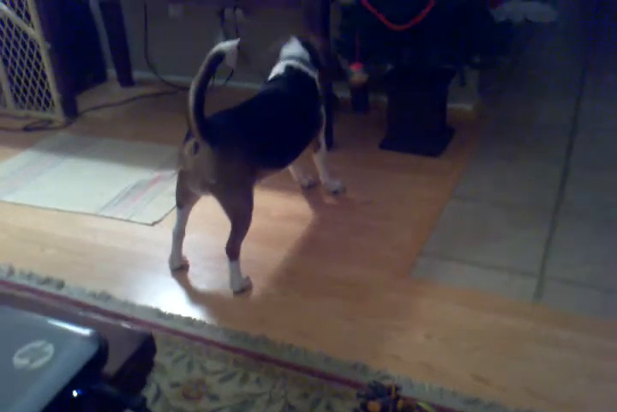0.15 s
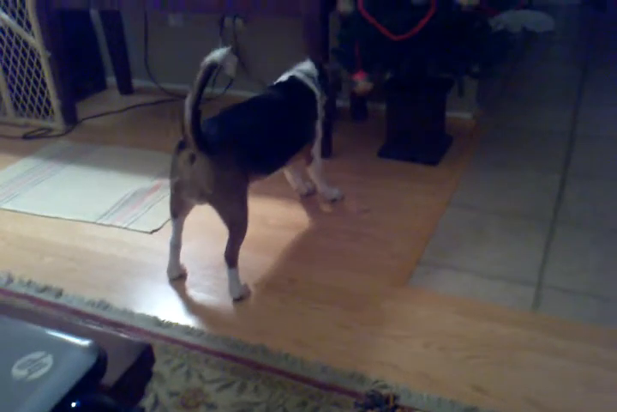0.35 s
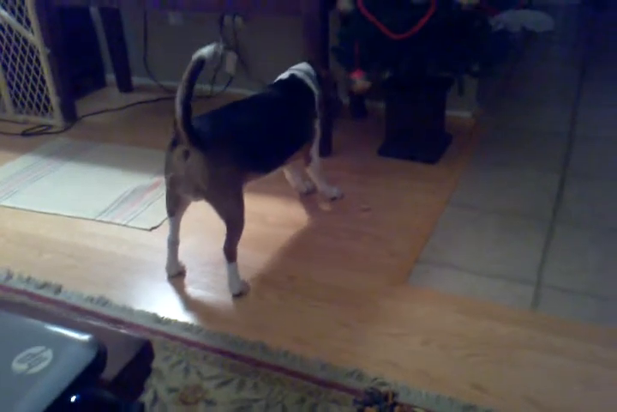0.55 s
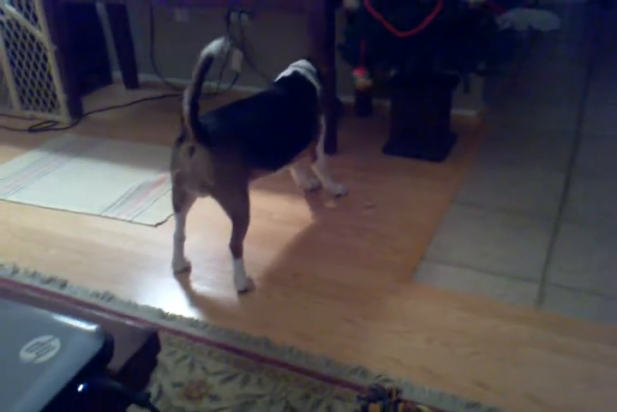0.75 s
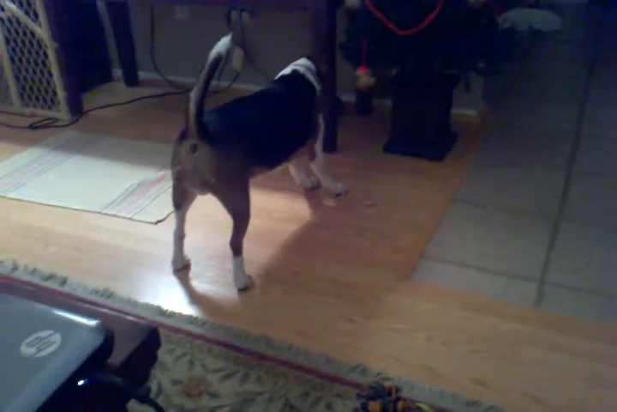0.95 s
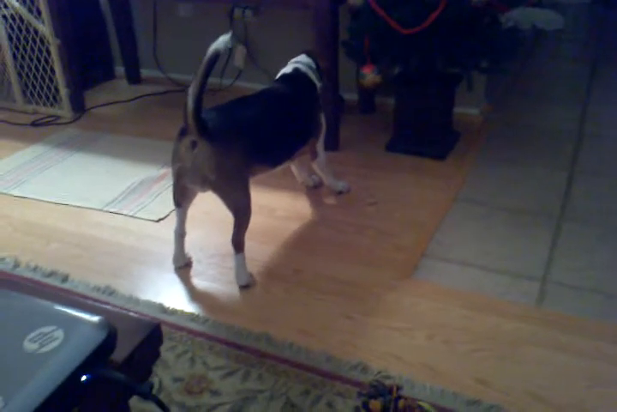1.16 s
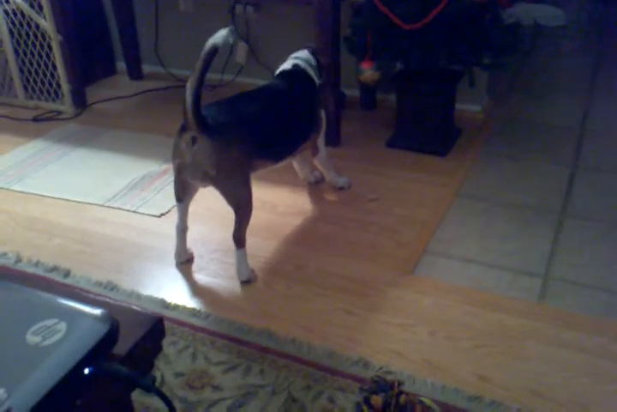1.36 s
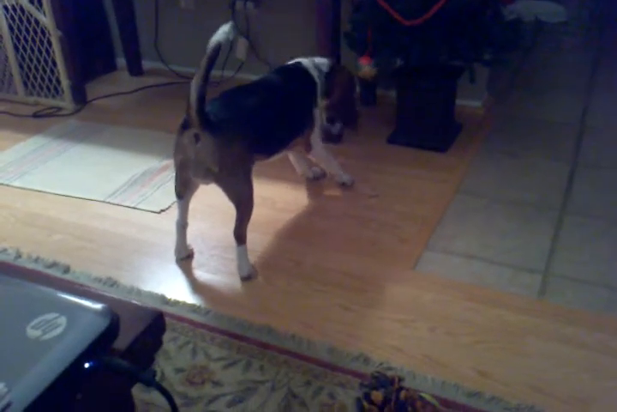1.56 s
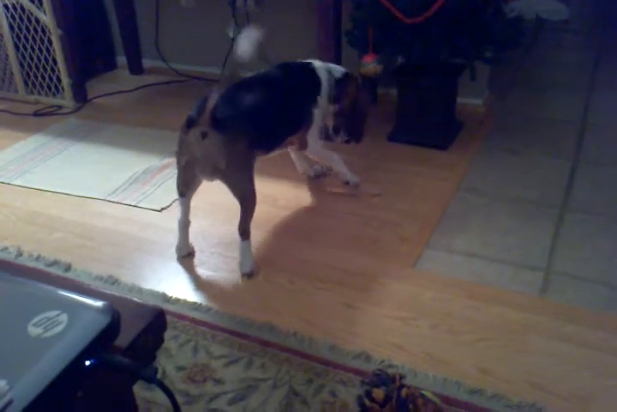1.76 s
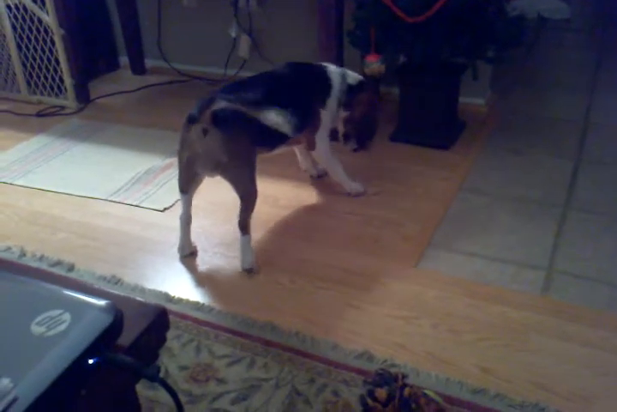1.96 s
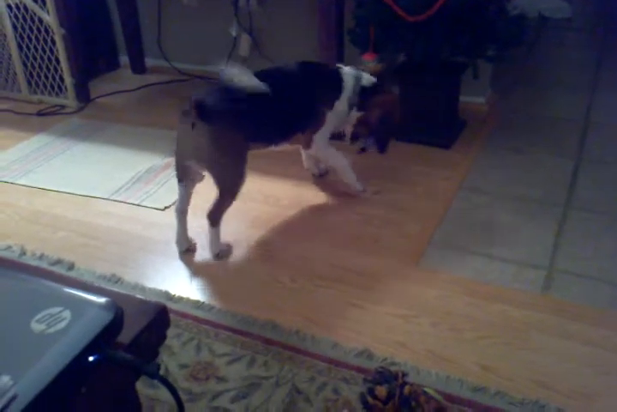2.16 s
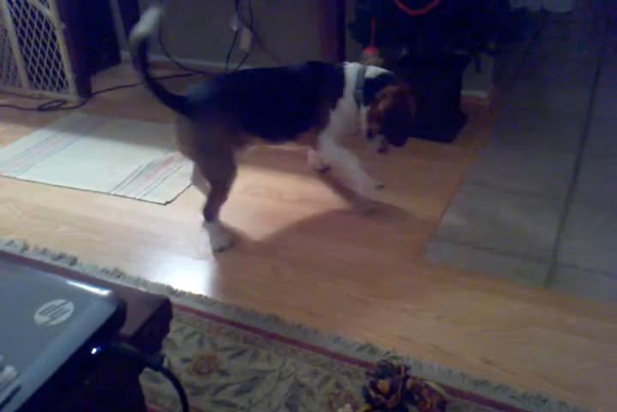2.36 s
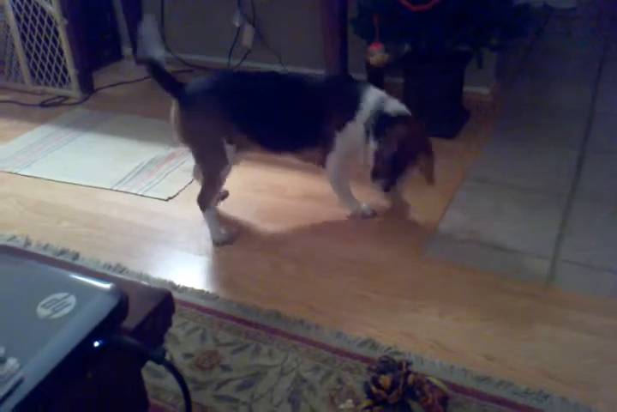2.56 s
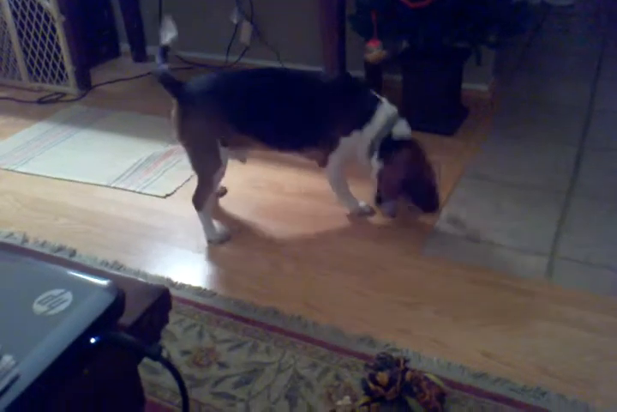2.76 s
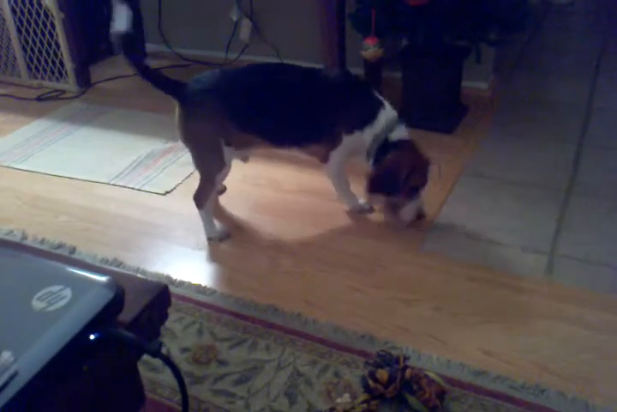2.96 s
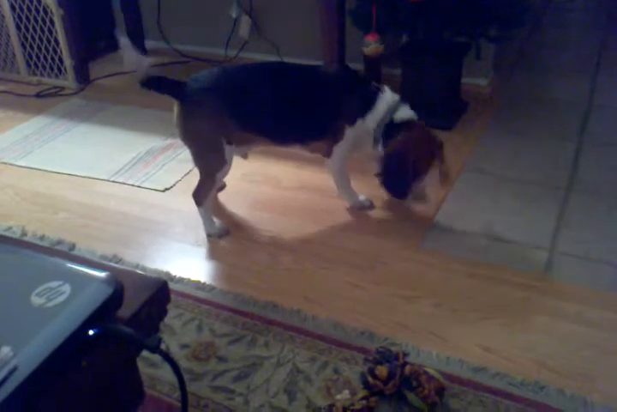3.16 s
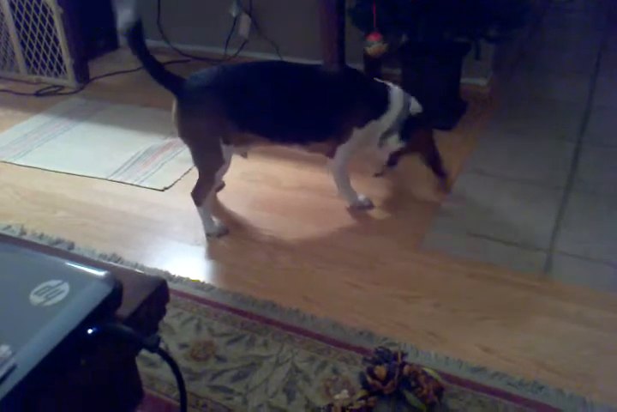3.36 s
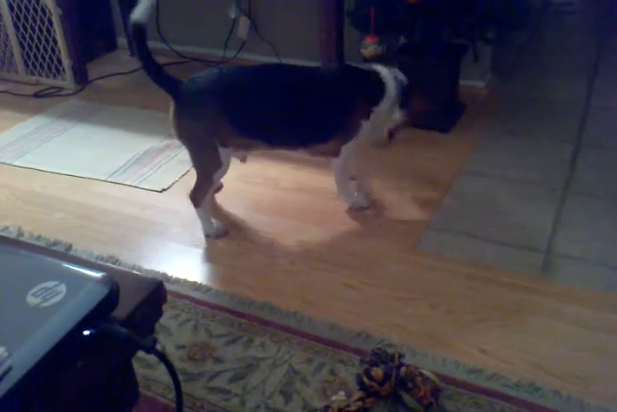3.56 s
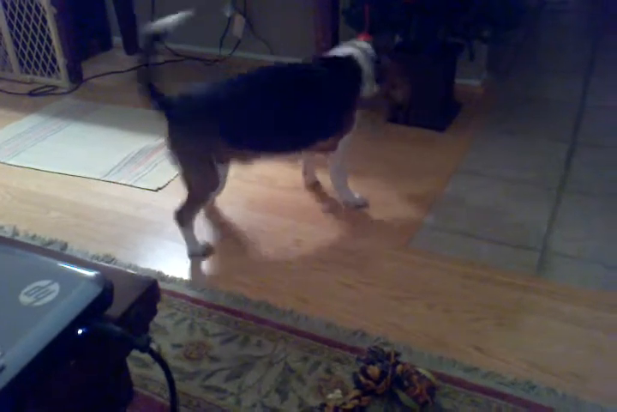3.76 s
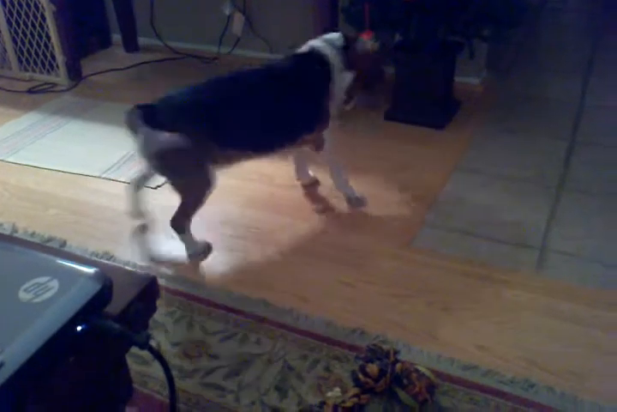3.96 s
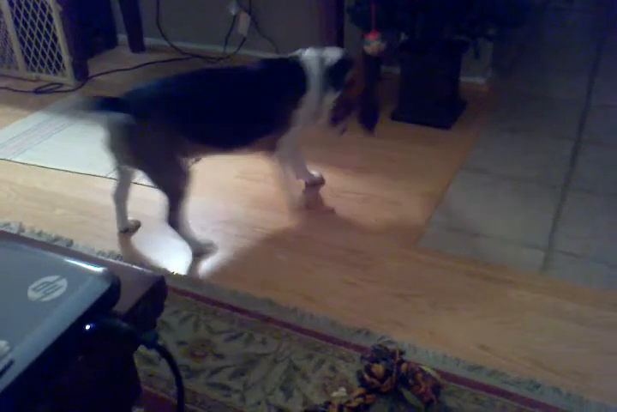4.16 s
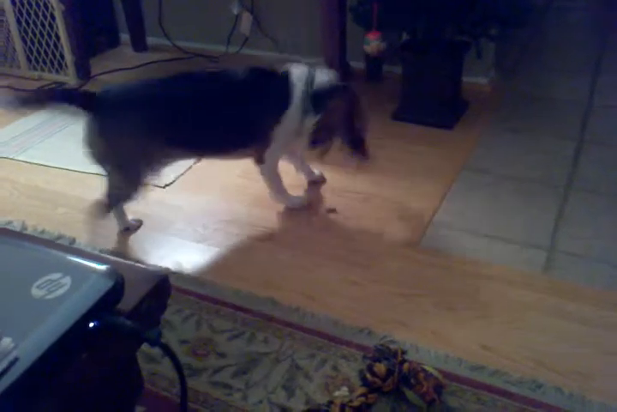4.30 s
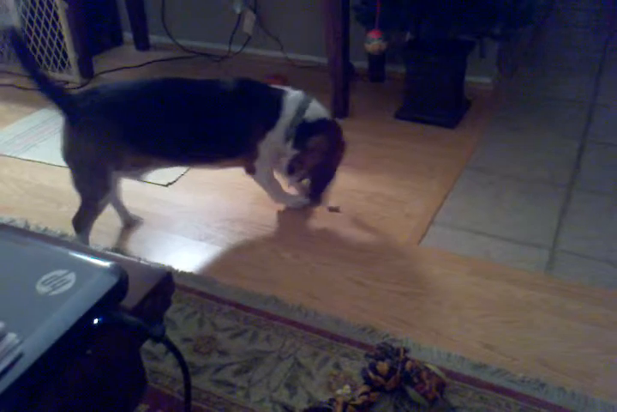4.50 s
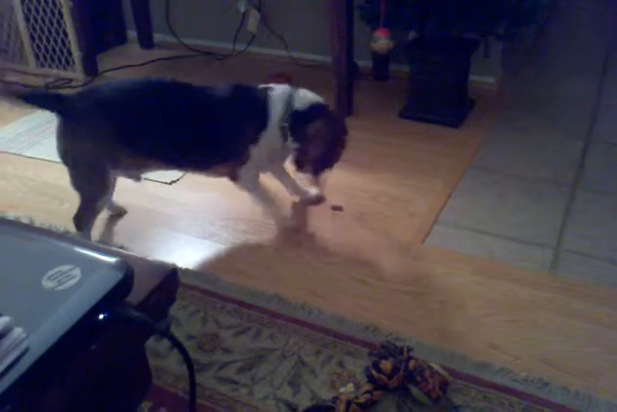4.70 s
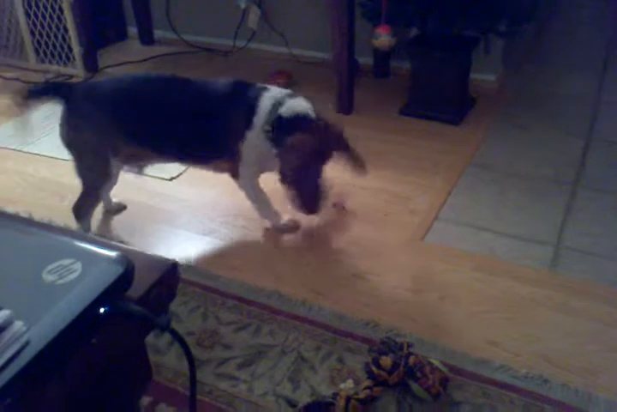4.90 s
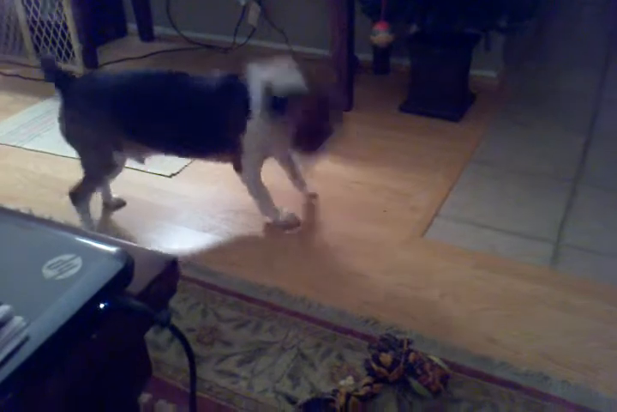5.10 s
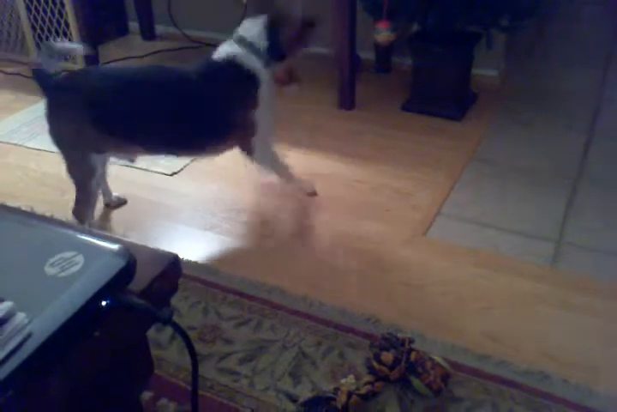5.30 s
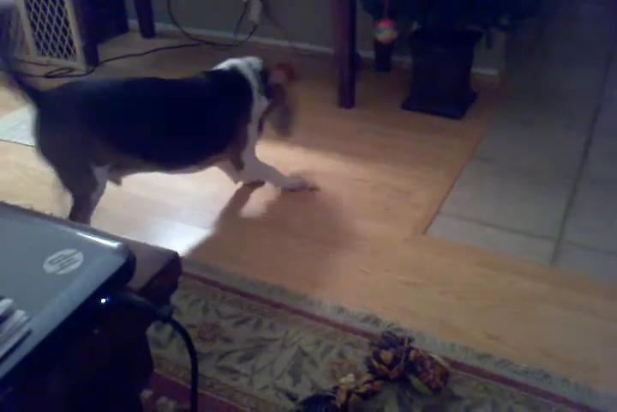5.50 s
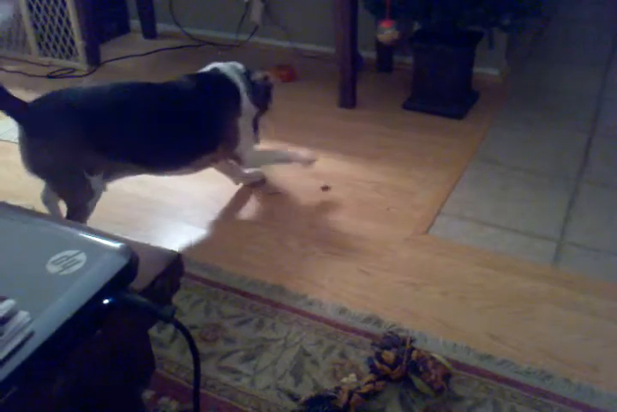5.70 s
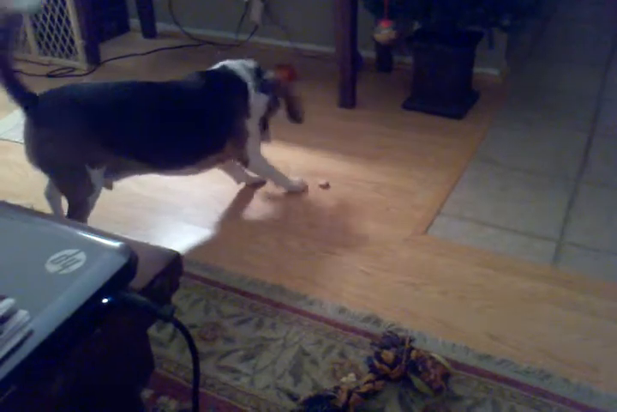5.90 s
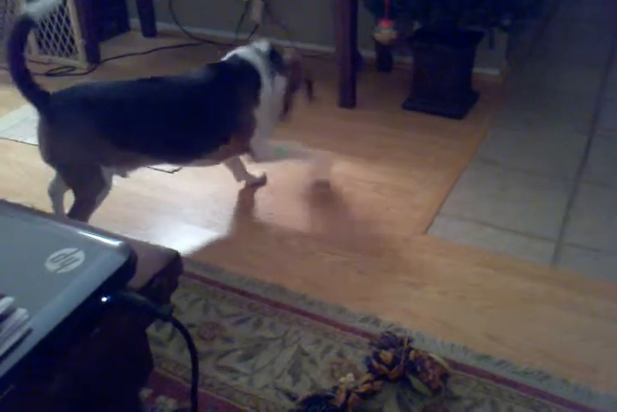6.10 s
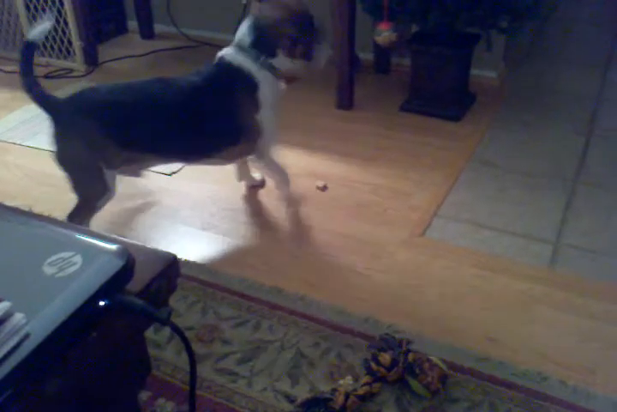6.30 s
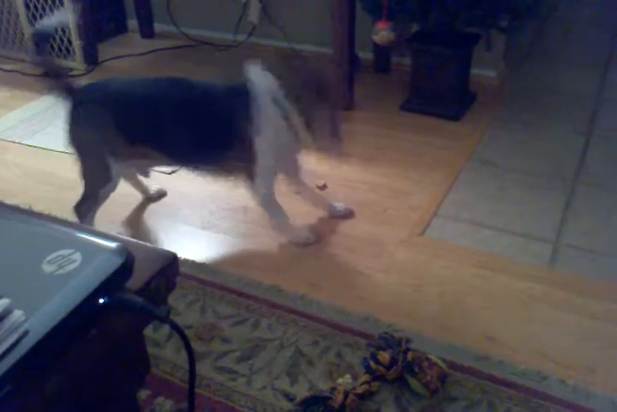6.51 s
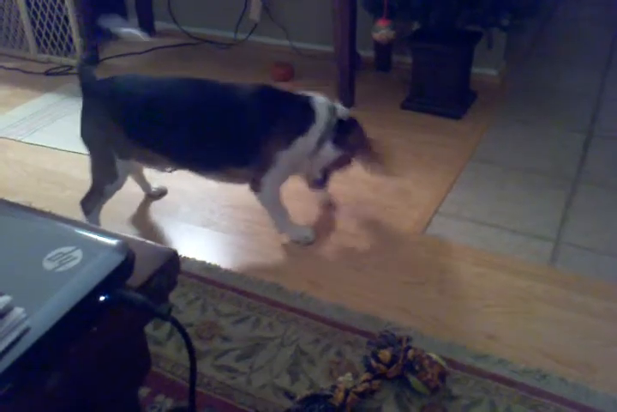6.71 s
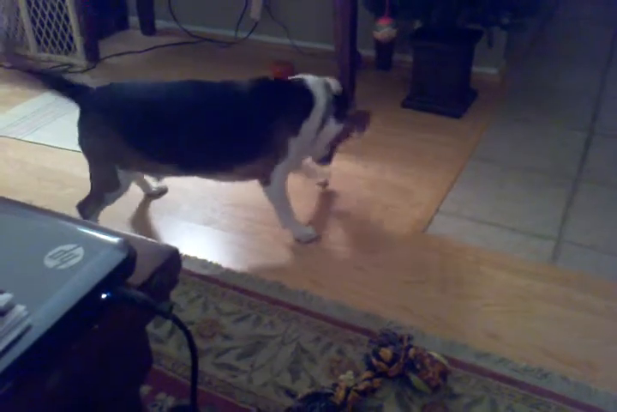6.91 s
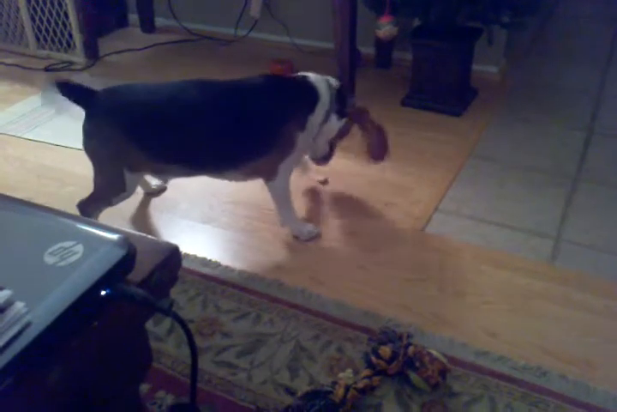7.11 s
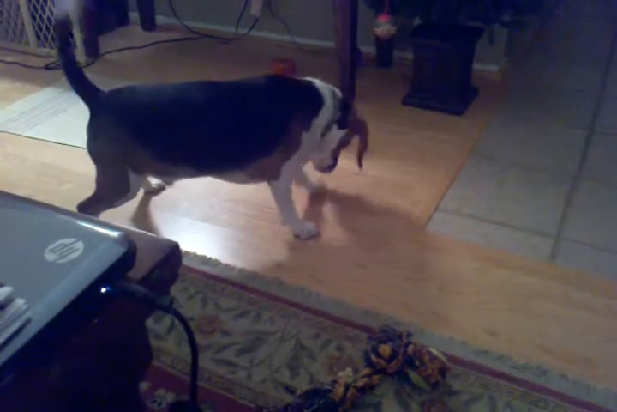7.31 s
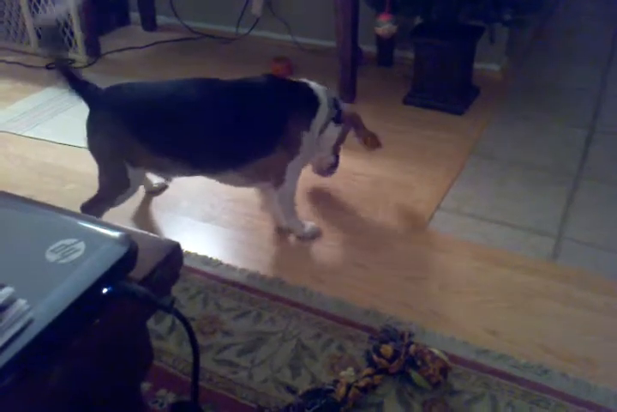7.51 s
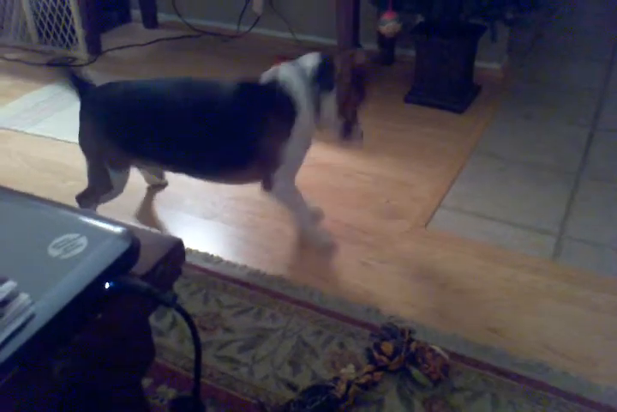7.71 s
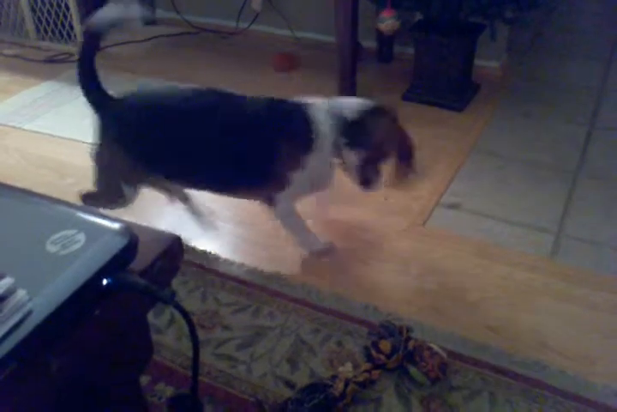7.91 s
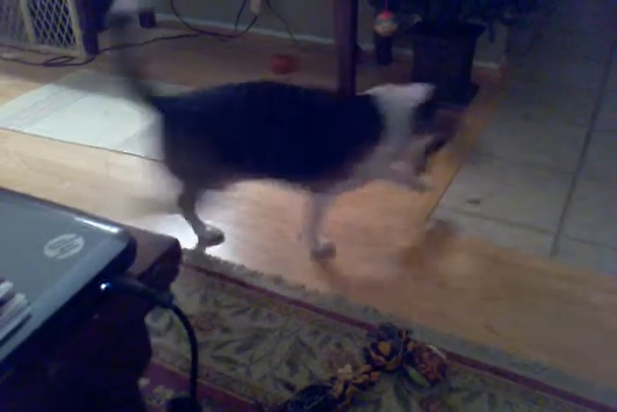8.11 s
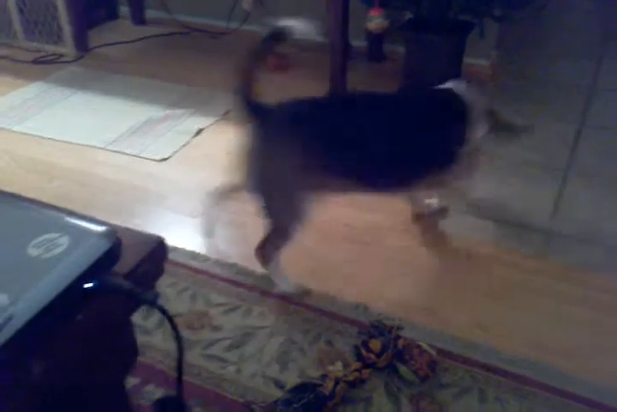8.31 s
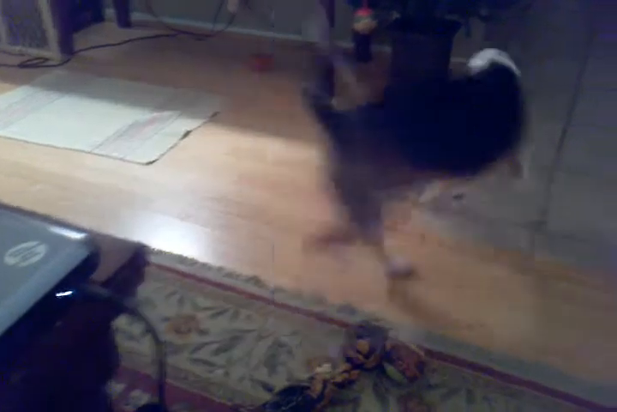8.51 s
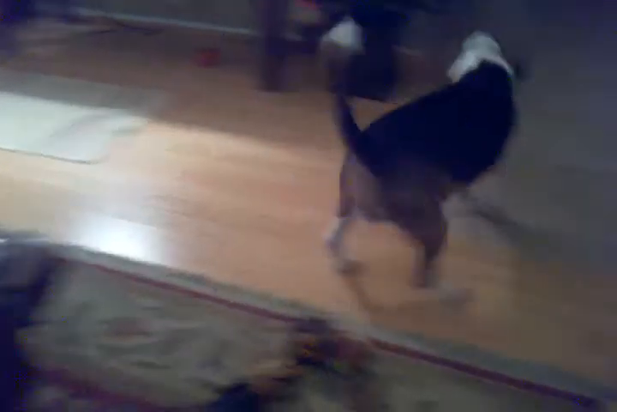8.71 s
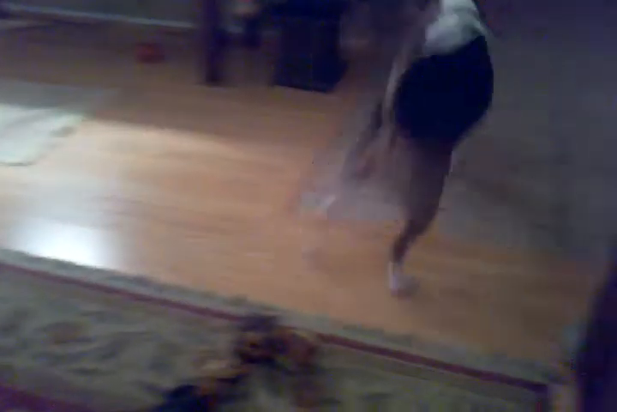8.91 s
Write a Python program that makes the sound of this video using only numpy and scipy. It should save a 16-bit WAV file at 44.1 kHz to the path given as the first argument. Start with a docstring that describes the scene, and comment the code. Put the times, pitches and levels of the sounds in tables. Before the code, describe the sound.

Close, dry claw sounds on a wooden floor: near silence over soft fan rush, then brittle clicks in twos and threes, short raspy scrapes, light paw scuffs and dull pad thumps. The boards knock and ring hollowly, and a collar tag tinkles faintly. A rattling scrabble peaks late, then sparse ticks follow as the dog leaves. The room adds a short echo, heard through a small camera's slightly phasey wide stereo.

```python
"""A living room with a hardwood floor: a dog paws at a treat close by, then trots off.
Claws click, knock, rattle and scrape, as sharp blows and stick-slip jerks that ring claw and board;
padded paws thump and scuff, a collar tag tinkles. The room answers briefly over a quiet fan and a hum.
The microphone is a small camera's, standing nearby, its stereo widened by combing mid and side."""
import sys
import numpy as np
from scipy import signal
from scipy.fft import rfft, irfft
from scipy.io import wavfile

SR = 44100
rng = np.random.default_rng(int(sys.argv[2]) if len(sys.argv) > 2 else 0)


def waveform_to_disk(signal):
    """Save audio, clipped to [-1, 1], as 16-bit WAV at the path in sys.argv[1]."""
    frames = np.transpose(np.atleast_2d(signal))
    scaled = np.clip(frames, -1, 1) * 32767
    samples = np.round(scaled).astype(np.int16)
    wavfile.write(sys.argv[1], SR, samples)


N = 399546  # length [samples]
# Levels in the tables are relative: each layer and the final mix add their own gain.


def gain_of(db):
    """Decibels to amplitude."""
    return 10 ** (np.asarray(db) / 20)


def evened(x):
    """Scales to rms 1."""
    return x / np.sqrt(np.mean(x ** 2) + 1e-20)


def unit(x):
    """Scales to energy 1."""
    return x / np.linalg.norm(x)


def read(points, hz):
    """Reads a table on a log-frequency axis."""
    f, value = np.transpose(points)
    return np.interp(np.log(hz + 1), np.log(f + 1), value)


def add(mix, s, sound):
    """Mixes a sound in at time s."""
    part = mix[max(round(s * SR), 0):][:len(sound)]
    part += sound[:len(part)]


def ring(colour, tilt_db=0, size=2048):
    """Minimum-phase impulse response of energy 1: a colour, tilted in dB per octave above 500 Hz."""
    hz = abs(np.fft.fftfreq(size, 1 / SR))
    octaves = np.log2(np.maximum(hz, 500) / 500)
    log_gain = np.log(gain_of(read(colour, hz) + tilt_db * octaves))
    spectrum = np.exp(np.conj(signal.hilbert(log_gain)))
    return unit(np.fft.ifft(spectrum).real[:size // 2])


# the fan's rush at the microphone: (frequency [Hz], level [dB])
AIR = [(25, -21), (50, -29), (80, -5.5), (120, -2.5), (180, 0.5), (270, -2), (400, -2.5), (750, -2.5),
       (1300, -9), (2000, -14.5), (3200, -12.5), (4800, -23), (7500, -21.5), (13500, -25.5)]
# how wide that rush is: (frequency [Hz], side level against mid [dB])
AIR_SIDE = [(60, 4), (130, -1.5), (290, 7), (630, 0.5), (1380, 2.5), (3000, -4), (7000, 2)]
# the hum's tones: (frequency [Hz], level [dB])
HUM = [(120, -65.5), (264, -74)]


def background(air_db, waver):
    """Mid and side of the fan's steady rush, shaped noise, with a hum that slowly wavers in level."""
    hz, t = np.fft.rfftfreq(N, 1 / SR), np.arange(N) / SR
    air = rfft(rng.standard_normal((2, N))) * gain_of(read(AIR, hz))
    air[1] *= gain_of(read(AIR_SIDE, hz))
    drift = evened(irfft(rfft(rng.standard_normal(N)) * np.exp(-hz / 8), N))
    hum = sum(gain_of(db) * np.sqrt(2) * np.sin(2 * np.pi * (f * t + rng.random())) for f, db in HUM)
    hum_mid_side = hum * (1 + waver * drift) * np.array([[1], [.3]])
    return gain_of(air_db) * evened(irfft(air, N)) + hum_mid_side


def friction(colour, slips_per_s, spread_db, force=1):
    """Tiny stick-slip jerks of uneven size and random sign, each ringing the same contact."""
    sizes = force * gain_of(spread_db * np.minimum(rng.exponential(1, N), 4)) * rng.choice([-1, 1], N)
    slips = sizes * (rng.random(N) < slips_per_s / SR)
    return evened(signal.oaconvolve(slips, ring(colour))[:N])


# claws dragged along the boards: (start [s], press-in [s], length [s], level [dB],
# grip [dB]: claws digging in rather than the pad rubbing, board pitch [Hz], rasp level [dB])
STROKES = [(0.795, 0.017, 0.068, -60, 1, 517, -10), (3.402, 0.0077, 0.12, -47.5, -3.5, 525, -4),
           (3.475, 0.028, 0.39, -49.5, -2.5, 519.3, -5), (4.897, 0.012, 0.15, -46.5, 0, 522, -3),
           (5.309, 0.0085, 0.04, -38.5, 0, 772, 5.5), (5.461, 0.0057, 0.041, -42, 3, 597, -3.5),
           (5.49, 0.024, 0.38, -50, -2.5, 522, -4), (7.196, 0.0048, 0.058, -42, 3.5, 523, 0),
           (7.242, .008, 0.084, -48, -6, 519, -3), (7.303, 0.027, 0.12, -41.5, 5.5, 513, 1),
           (7.493, 0.015, 0.076, -41, -8, 516.3, -5), (7.65, 0.01, 0.17, -45.5, -2, 569, -4)]
# colour of the shaken board: (frequency [Hz], level [dB])
DRAG = [(35, -29), (120, -31), (380, -16.5), (520, 1), (650, -1), (800, -5.5), (1100, -6), (1700, -12.5),
        (4000, -48)]
# colour of the claws' coarse bite: (frequency [Hz], level [dB])
BITE = [(50, -60), (700, -24), (1200, 7), (1700, 5.5), (2400, 8), (3500, -22), (8000, -45)]
# colour of the fine rasp on the grain: (frequency [Hz], level [dB])
RASP = [(50, -66), (1200, -39), (2600, 3.5), (3600, -2), (4600, -1.5), (5600, -3.5), (7000, -0.5),
        (9500, -11.5), (13500, -28)]
DRAG_HZ = 520  # board pitch that the DRAG colour describes
EASE_DB, LIFT_S = -8, 0.015  # the paw eases off through a stroke, then lifts
BITE_GLIDE_OCTAVES = 0.28  # the bite rises in pitch as the paw gathers speed
# claws catch on the grain and let go about a hundred times a second
CATCHES_PER_S, CATCH_S, CATCH_DB, CATCH_SPREAD_DB = 110, 0.0012, 2.5, 3


def scrapes(board_db, bite_db, rasp_db):
    """Dragged claws shake the board, bite in coarse slips and rasp finely on its grain."""
    jolts = gain_of(CATCH_DB + CATCH_SPREAD_DB * np.minimum(rng.exponential(1, N), 3))
    jolts = jolts * (rng.random(N) < CATCHES_PER_S / SR)
    catching = 1 + signal.lfilter([1], [1, -np.exp(-1 / (CATCH_S * SR))], jolts)
    board = gain_of(board_db) * friction(DRAG, slips_per_s=1500, spread_db=2.0, force=catching)
    bite = gain_of(bite_db) * friction(BITE, slips_per_s=900, spread_db=2.0, force=catching)
    rasp = gain_of(rasp_db) * friction(RASP, slips_per_s=1500, spread_db=6.5, force=catching)
    out = np.zeros(N)
    for s, press_s, length, db, grip_db, board_hz, harsh_db in STROKES:
        t = np.arange(0, length, 1 / SR)
        at = round(s * SR) + np.arange(len(t))
        press, lift = np.minimum(t / press_s, 1), np.minimum((length - t) / LIFT_S, 1)
        pressure = press * gain_of(db + EASE_DB * t / length) * lift
        # reading a layer faster or slower moves its pitch
        speed = 2 ** (BITE_GLIDE_OCTAVES * (t / length - .5))
        rising = np.interp(at[0] + np.cumsum(speed), np.arange(N), bite)
        body = np.interp(at[0] + t * SR * board_hz / DRAG_HZ, np.arange(N), board)
        contact = body / gain_of(grip_db) + rising * gain_of(grip_db) + rasp[at] * gain_of(harsh_db)
        add(out, s, pressure * contact)
    return out


def chatter(grit, db, chatter_s, glance_s):
    """Force of one contact: a sharp blow, then a rattle that swells in and dies."""
    t = np.arange(len(grit)) / SR
    rattle = grit ** 3 * np.exp(-t / chatter_s) * (1 - np.exp(-t / glance_s))
    return (t == 0) + gain_of(db) * unit(rattle)


RING_SPREAD_DB = -10  # the ring is weaker in the room than on the direct path
# claw tips snapping on the finish, often two or three of one paw in a row:
# (time [s], level [dB], brightness [dB per octave], chatter [dB], tip ring [Hz], tip ring level [dB],
# shaft ring [Hz], shaft ring level [dB], extra level into the room [dB])
CLICKS = [(1.9338, -45, -3, -14, 7050, -8, 4600, -16, 1), (1.992, -37, -5, 2, 7200, -13, 4850, 2, 2),
          (2.0631, -26.5, -1.5, -16, 7570, -4.5, 4700, -10.5, -1),
          (2.0667, -41, 0, -6, 7200, -10, 4730, 0, -3), (2.3995, -38, -6.5, 5, 6600, 2, 4500, -8, -1),
          (3.7458, -23.5, 1, -4, 6500, 3, 5140, -7, -1), (3.7477, -23, -2.5, -3, 6700, -4, 3900, -20, -1),
          (4.0402, -29.5, -1.5, -7, 7500, 0, 4600, -8, 1), (4.0437, -35.5, -3, 3, 7340, -2, 4700, 8, 4),
          (4.0493, -29, 1.5, -7, 7500, -4, 4600, -6, 0.5),
          (4.147, -24.5, -1.5, 3, 7400, -2, 5200, -4, -0.5),
          (4.1602, -23.5, 2, -9, 7050, -8, 4800, -13, -2),
          (4.698, -33.5, 1.5, -15, 6850, -24, 4700, -9, -1.5),
          (4.918, -26.5, -3.5, -9, 6900, 0, 4560, -7, 0), (5.4527, -35, -9, -9, 6660, -7, 4500, -13, 1),
          (5.5825, -29.5, -8.5, -12, 6700, -13, 4480, -10, -5),
          (5.7377, -39, -10, -5, 7000, -16, 4500, -13, 2),
          (5.8113, -15, 0.5, -22, 7070, -2, 4700, -2.5, -0.5),
          (5.8136, -24, 0, -12, 7400, -10, 4500, 7, -3), (5.816, -31, 0, -10, 7400, -12, 4600, 14, -3),
          (6.2529, -18.5, 1, -6, 6600, 6, 4870, -7, -3), (6.254, -21, -1.5, -5, 7400, -2, 4830, -9, 0.5),
          (6.256, -20, 2.5, -6, 7140, -3, 4200, -14, -2), (6.4907, -34, -4, -3, 7400, -1, 4570, -9, 0),
          (6.9029, -26, -4, 2, 7200, 6, 5200, -9, -4.5),
          (6.9039, -19.5, -0.5, -24, 6600, 4.5, 4000, -5.5, 0),
          (7.1993, -34, 10, 6, 7600, -16, 4450, -20, 4.5), (7.508, -27.5, -4, 3, 7300, -8, 4500, -12, 2),
          (7.7051, -27.5, -5.5, -3, 7200, -12, 4900, -14, 0.5),
          (7.716, -25, -3, -6, 7800, -7, 4700, -15, 1.5),
          (8.5098, -38.5, 10, -6, 7650, -20, 4500, -18, 6.5),
          (8.8635, -26.5, 0, -15, 7160, -8, 4200, -6, -2), (8.8717, -28.5, -1, -8, 7400, -5, 3930, -13, -3),
          (8.9338, -33, -2, -6, 7600, -15, 3900, -13, 0.5),
          (8.959, -34.5, 10, -2, 7160, -18, 4500, -18, -2), (9.002, -41, -9, 0, 7000, -17, 4000, -16, -3)]
# colour of the snap on the direct path: (frequency [Hz], level [dB])
CLAW = [(40, -66), (150, -53), (500, -36), (1500, -11.5), (2500, -11), (3400, -6.5), (4500, -7.5),
        (5600, 5.5), (7100, 7), (8500, -11.5), (10500, -6.5), (12000, -5.5), (13500, -10.5)]
# colour of the snap as the whole room receives it: (frequency [Hz], level [dB])
CLAW_SPREAD = [(150, -25), (500, -3), (1500, -9), (2500, 0), (3400, 2), (4000, 8.5), (4600, 3.5),
               (5600, 5.5), (7100, 3), (8500, 5.5), (10500, -4), (12000, -3), (13500, -9)]
TIP_T60_S, SHAFT_T60_S = 0.0015, 0.0083  # the tip rings very briefly, the shaft a little longer


def clicks(level_db, chatter_s, glance_s, swell_s):
    """A claw snaps down and rings at tip and shaft; returns the direct sound and what feeds the room."""
    direct, send, t = np.zeros(N), np.zeros(N), np.arange(4096) / SR

    def claw_tone(hz, db, t60):
        swelling = gain_of(-60 * t / t60) * np.sin(2 * np.pi * hz * t) * (1 - np.exp(-t / swell_s))
        return gain_of(db) * unit(np.gradient(swelling))

    for row, grit in zip(CLICKS, rng.standard_normal((len(CLICKS), len(t)))):
        s, db, tilt_db, chatter_db, tip_hz, tip_db, shaft_hz, shaft_db, room_db = row
        force = chatter(grit, chatter_db, chatter_s, glance_s)
        tone = claw_tone(tip_hz, tip_db, TIP_T60_S) + claw_tone(shaft_hz, shaft_db, SHAFT_T60_S)
        near = ring(CLAW, tilt_db, size=8192) + tone
        far = ring(CLAW_SPREAD, tilt_db, size=8192) + tone * gain_of(RING_SPREAD_DB)
        add(direct, s, gain_of(db + level_db) * unit(signal.fftconvolve(force, near)))
        add(send, s, gain_of(db + level_db + room_db) * unit(far))
    return np.array([direct, send])


# a claw skids for an instant: (time of release [s], length [s], level [dB])
SKIDS = [(1.995, 0.013, -47.5), (6.917, 0.0065, -34), (8.872, 0.013, -33)]
# colour of the skid: (frequency [Hz], level [dB])
SKID = [(50, -48), (500, -32), (2000, -8), (3300, -5.5), (4400, 2), (5600, -1), (7200, 4), (8500, -3),
        (10500, -13), (13500, -22)]


def skids(release_s):
    """A claw stutters in fast stick-slip, swells for half its length, holds, then slips free."""
    t = np.arange(N) / SR
    pressure = np.zeros(N)
    for s, length, db in SKIDS:
        corners = [s - length, s - length / 2, s, s + release_s]
        # a very faint trace of friction stays on after the release
        pressure += gain_of(db) * np.interp(t, corners, [0, 1.0, 1, 0.013])
    return pressure * friction(SKID, slips_per_s=3400, spread_db=2.0)


# brief glancing slides of a paw: (time of the middle [s], level [dB], half-length [s])
SCUFFS = [(2.2, -52.5, 0.013), (2.416, -47.5, 0.02), (2.573, -54, 0.03), (3.762, -46, 0.018),
          (3.887, -52.5, 0.03), (4.5, -59.5, 0.023), (4.596, -60.5, 0.07), (4.983, -45, 0.041),
          (5.946, -42.5, 0.02), (5.96, -37, 0.01), (6.198, -43.5, 0.0082), (6.209, -44.5, 0.019),
          (6.28, -44, 0.011), (6.375, -45, 0.076), (7.016, -44, 0.018), (7.575, -33, 0.027),
          (7.589, -40, 0.013), (8.151, -48, 0.038), (8.269, -49.5, 0.034), (8.495, -59.5, 0.14),
          (8.958, -42.5, 0.015), (9.022, -49.5, 0.04)]
# colour of the scuff: (frequency [Hz], level [dB])
SCUFF = [(50, -22), (300, -33), (2500, -7), (3600, 0.5), (4400, -0.5), (5600, -1.5), (7200, 0), (9000, -8),
         (13500, -26)]


def scuffs():
    """A glancing paw swells and fades in a light hiss of dense stick-slip."""
    t = np.arange(N) / SR
    pressure = sum(gain_of(db) * np.maximum(1 - abs(t - s) / half_s, 0) ** 2 for s, db, half_s in SCUFFS)
    return pressure * friction(SCUFF, slips_per_s=8300, spread_db=1.5)


# ring of the spot that is touched: (ratio to the ring frequency, level [dB], t60 [s])
SPOT_MODES = [(1, 0, 0.028), (1.5, -7, 0.016)]


def strikes(rows, colour, spread, level_db, chatter_s, glance_s, swell_s):
    """A contact lands, rings at its own pitch and chatters; returns the direct sound and what feeds the room."""
    direct, send, t = np.zeros(N), np.zeros(N), np.arange(4096) / SR
    for row, grit in zip(rows, rng.standard_normal((len(rows), len(t)))):
        s, db, tilt_db, chatter_db, hz, ring_db = row
        force = chatter(grit, chatter_db, chatter_s, glance_s)
        tone = sum(gain_of(mode_db - 60 * t / t60) * np.sin(2 * np.pi * hz * ratio * t) / ratio
                   for ratio, mode_db, t60 in SPOT_MODES)
        tone = gain_of(ring_db) * unit(np.gradient(tone * (1 - np.exp(-t / swell_s))))
        near = ring(colour, tilt_db, size=8192) + tone
        far = ring(spread, tilt_db, size=8192) + tone * gain_of(RING_SPREAD_DB)
        add(direct, s, gain_of(db + level_db) * unit(signal.fftconvolve(force, near)))
        add(send, s, gain_of(db + level_db) * unit(far))
    return np.array([direct, send])


# padded paws landing:
# (time [s], level [dB], brightness [dB per octave], chatter [dB], ring [Hz], ring level [dB])
THUMPS = [(2.3995, -36, 0, -2, 565, -11), (2.413, -44, 1, 6, 400, -5), (2.428, -39.5, 1, 4, 425, -2),
          (6.455, -34, 4.5, -5, 540, -5), (6.475, -38.5, 0, -11, 370, -3), (6.497, -40.5, 4, -2, 340, 4),
          (7.242, -36.5, 3, 1, 520, -12), (7.509, -25.5, 10, -14, 560, -10),
          (8.6668, -39, 4, -14, 297, -0.5), (8.6698, -40, 1.5, -14, 645, 10)]
# colour of the pad, direct and into the room: (frequency [Hz], level [dB])
PAD = [(30, -50), (80, -29), (200, -25), (310, -5), (400, -1), (470, 9), (540, 2.5), (640, -4.5),
       (1000, -15.5), (1900, -17), (3000, -18.5), (13000, -37.5)]


def thumps():
    """Padded paws land with a dull thump and a longer, gentle chatter."""
    return strikes(THUMPS, PAD, PAD, level_db=17.0, chatter_s=0.016, glance_s=0.003, swell_s=0.00063)


# knocks on the board, and short rattling scrapes that ring it:
# (time [s], level [dB], brightness [dB per octave], chatter [dB], ring [Hz], ring level [dB])
KNOCKS = [(3.5138, -40, -13, 10, 526, -9), (3.5466, -37, -7.5, -10, 528, -15),
          (3.5775, -36.5, -4.5, -4, 520, -18), (3.6688, -39, -6, -6, 630, -3),
          (3.7024, -35.5, -7, -5, 507, -26), (4.8998, -30, 0, 2, 774, -16), (5.3205, -27, 11, -3, 770, 5),
          (5.3311, -28.5, -7, -7, 764, 3), (5.3362, -36.5, -1, -6, 775, -2),
          (5.4528, -25.5, 1, 0, 765, -12), (5.4736, -26, -1.5, -2, 784, -13), (5.583, -24, 0, 6, 810, -10),
          (5.543, -38, 1, -2, 520, -8), (5.6682, -33.5, 0, 1, 514, -5), (5.7612, -35, -2, 1, 513, -17),
          (7.2003, -33.5, 0, -1, 523, -8), (7.3345, -31, 3.5, 0, 1700, -4), (7.3485, -30, 3, 6, 1410, -14),
          (7.3525, -28.5, 2, 10, 1260, 7), (7.361, -29.5, 6, 6, 1400, -2), (7.3823, -26, -2, 3, 1720, 6),
          (7.4108, -28.5, -2.5, -4, 1520, 3), (7.4226, -28.5, -3, -15, 1570, -8),
          (7.5063, -22, 8, 11, 524, -6), (7.508, -26, -0.5, -10, 503, -16), (7.5214, -24, 5, -3, 527, -8),
          (7.523, -16.5, 2, -16, 507, -9), (7.5266, -26, 0.5, 5, 529, -11), (7.6501, -17, -5, -5, 510, -28),
          (7.661, -30.5, -8, -6, 1400, -6), (7.670, -30, -7, -2, 720, 2), (7.7193, -24, -3, -8, 590, -9),
          (7.7477, -30, -1, -14, 530, -16), (7.7683, -27.5, -0.5, -6, 788, -22),
          (7.8214, -25, 4.5, -12, 765, -24), (8.6667, -49, -10, 12, 850, -2)]
# colour of these contacts on the direct path: (frequency [Hz], level [dB])
BOARD = [(35, -44), (100, -26), (330, -21), (520, 1.5), (900, 5), (1700, 5.5), (2800, 6.5), (4400, 5),
         (5600, -5), (7000, -15), (9500, -27), (13500, -25)]
# colour of these contacts as the whole room receives them: (frequency [Hz], level [dB])
BOARD_SPREAD = [(35, -48), (100, -18), (330, -16), (520, 2.5), (900, 2.5), (1700, 2.5), (2800, 7),
                (4400, 3), (5600, -13), (7000, -11.5), (9500, -19.5), (13500, -28)]


def knocks_and_rattles():
    """Knocks and short rattling scrapes excite the board, which rings at the pitch of the spot touched."""
    return strikes(KNOCKS, BOARD, BOARD_SPREAD, level_db=14.5, chatter_s=0.0046, glance_s=0.00062,
                   swell_s=0.00022)


# the collar tag tinkles: (time [s], level [dB])
TINKLES = [(5.168, -65), (5.241, -58), (6.35, -40.5), (6.391, -47)]
# the ring of the tag: (frequency [Hz], level [dB], t60 [s])
TAG_MODES = [(12500, 0, 0.06), (12690, -3, .06), (12860, -6, .05), (13650, -3, .06)]


def tag():
    """A small metal disc on the collar rings very high, in a cluster of close modes."""
    out, t = np.zeros(N), np.arange(SR // 4) / SR
    chime = sum(gain_of(db - 60 * t / t60) * np.sin(2 * np.pi * hz * t) for hz, db, t60 in TAG_MODES)
    for s, db in TINKLES:
        add(out, s, gain_of(db) * chime * (1 - np.exp(-t / 0.0043)))
    return out


# the boards' own ring: (frequency [Hz], level [dB], t60 [s])
BOARD_MODES = [(520, -32, 0.084), (628, -39, 0.23), (784, -41, 0.14), (1154, -28, 0.021)]


def board_ringing(x, level_db):
    """Adds the dying modes that a sound leaves in the boards."""
    t = np.arange(SR // 3) / SR
    tail = sum(gain_of(db - 60 * t / t60) * np.cos(2 * np.pi * hz * t) for hz, db, t60 in BOARD_MODES)
    return x + gain_of(level_db) * signal.oaconvolve(x, tail[None], axes=1)[:, :N]


# how long the living room rings: (frequency [Hz], t60 [s])
ROOM_T60 = [(150, 0.52), (500, 0.59), (1500, 0.47), (4500, 0.42), (8000, 0.34), (14000, 0.43)]


def room(x, early_db, early_s, build_s):
    """Mid and side tails: sparse reflections build up from floor and furniture, then die band by band."""
    t = np.arange(SR * 3 // 4) / SR
    taps = rng.choice([-1., 1.], (2, len(t))) * (rng.random((2, len(t))) < .15) * (t > .002)
    taps *= (1 + gain_of(early_db) * np.exp(-t / early_s)) * (1 - np.exp(-t / build_s))
    hz, when, bands = signal.stft(taps, SR, nperseg=256)
    decay = gain_of(-60 * when / read(ROOM_T60, hz)[:, None])
    tail = signal.istft(bands * decay, SR, nperseg=256)[1]
    tail = tail / np.linalg.norm(tail, axis=1, keepdims=True)
    return signal.fftconvolve(x[None], tail, axes=1)[:, :N]


def scene():
    """All contacts with the floor, the tag, their echo and the quiet room, as left and right."""
    claws = clicks(level_db=18.0, chatter_s=0.001, glance_s=0.00079, swell_s=0.00027)
    slides = scrapes(board_db=-6.5, bite_db=-6.0, rasp_db=-4.0) + scuffs()
    # gain pairs [dB]: on the direct path, into the room
    contacts = claws * gain_of([[0], [-6]])
    contacts = contacts + skids(release_s=0.001) * gain_of([[0], [-12]])
    contacts = contacts + knocks_and_rattles() * gain_of([[0], [-1.2]])
    contacts = contacts + thumps() * gain_of([[0], [-3]])
    contacts = contacts + slides * gain_of([[-1], [-2.5]])
    direct, send = board_ringing(contacts + tag(), level_db=-16.0)
    echo = room(send, early_db=-3.0, early_s=0.0094, build_s=0.0021) * gain_of([[0], [-.5]])
    mid, side = echo + background(air_db=-56.5, waver=0.47)
    mid = mid + direct
    return np.array([mid + side, mid - side])


# the widener in the bass: (frequency [Hz], side angle [rad])
BASS_ANGLE = [(30, 0.98), (125, 0.96), (250, 0.42), (500, 0.36), (1000, 0.23), (1470, 0.013)]
COMB_HZ, EDGE_HZ = 2940, 14000  # comb spacing above the bass, upper band limit


def record(dry):
    """The camera's stereo widener combs mid and side in turn; then the band limit."""
    hz = np.fft.rfftfreq(N, 1 / SR)
    mid, side = rfft(dry[0] + dry[1]) / 2, rfft(dry[0] - dry[1]) / 2
    angle = read(BASS_ANGLE, hz) * (hz < COMB_HZ / 2) + np.pi * np.maximum(hz / COMB_HZ - .5, 0)
    side_in_centre = read([(3000, 0.0049), (6000, 0.77), (9000, 0.74), (13000, 0.58)], hz)
    mid_in_width = read([(500, 0.5), (2300, 0.34), (3500, 0.34), (7000, 0.84)], hz)
    off_axis = np.exp(-2j * np.pi * hz * 8e-6)  # 8 microseconds: the dog is a little nearer to one port
    centre = mid * np.cos(angle) + side * side_in_centre
    width = -1j * np.sin(angle) * (mid_in_width * mid * off_axis + 1.25 * side)
    wide = irfft(np.array([centre + width, centre - width]), N) * gain_of([[-.2], [.2]])
    band_limit = signal.firwin(301, EDGE_HZ, window=("kaiser", 8), fs=SR)
    return signal.oaconvolve(wide, band_limit[None], "same")


dry = scene()
out = record(dry)
waveform_to_disk(out)
```